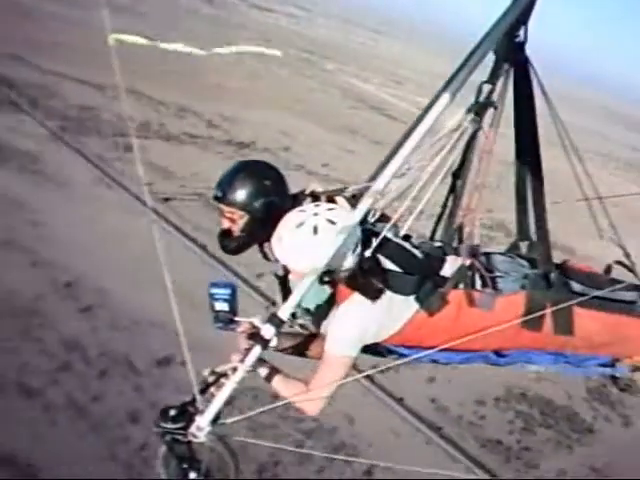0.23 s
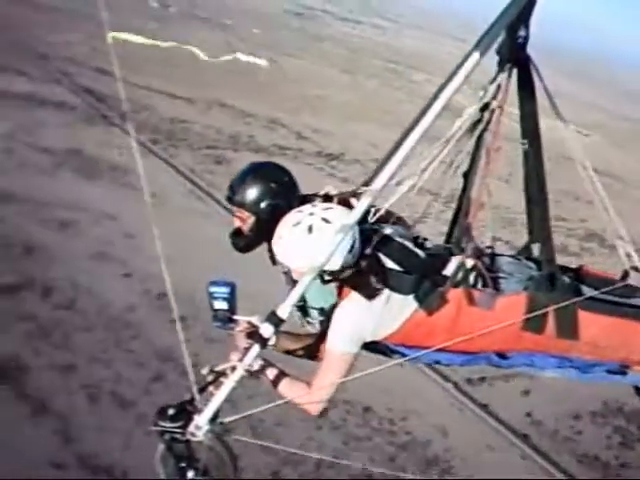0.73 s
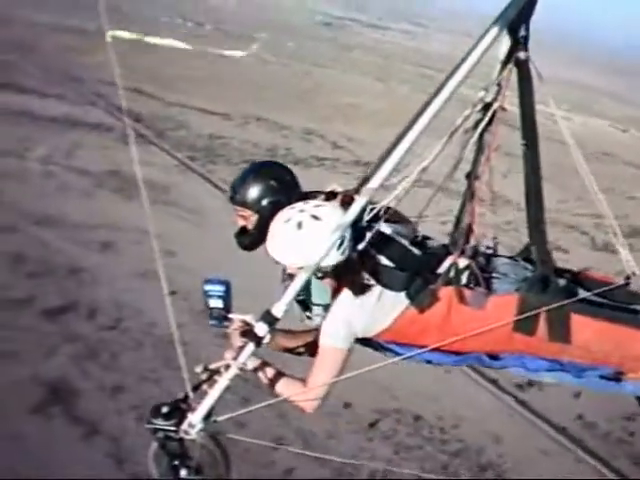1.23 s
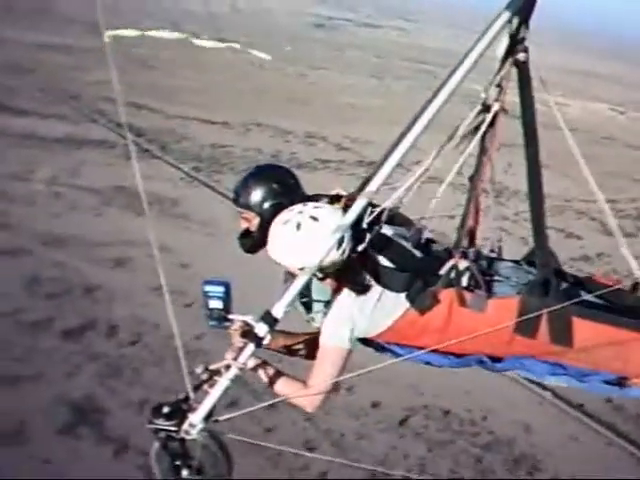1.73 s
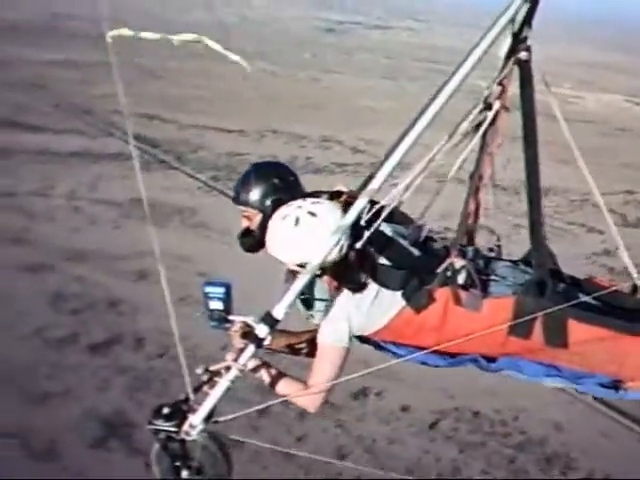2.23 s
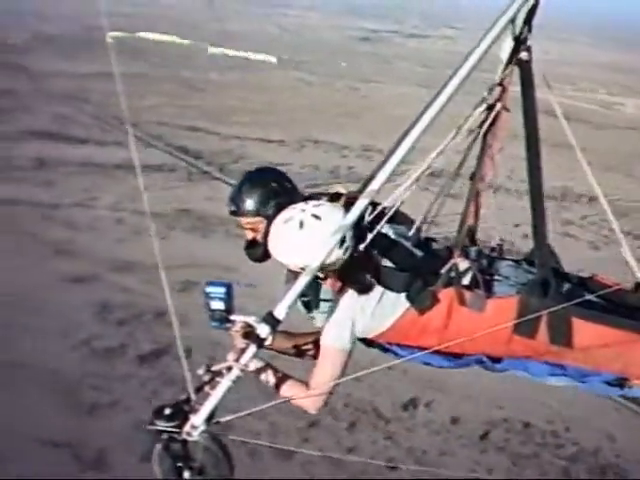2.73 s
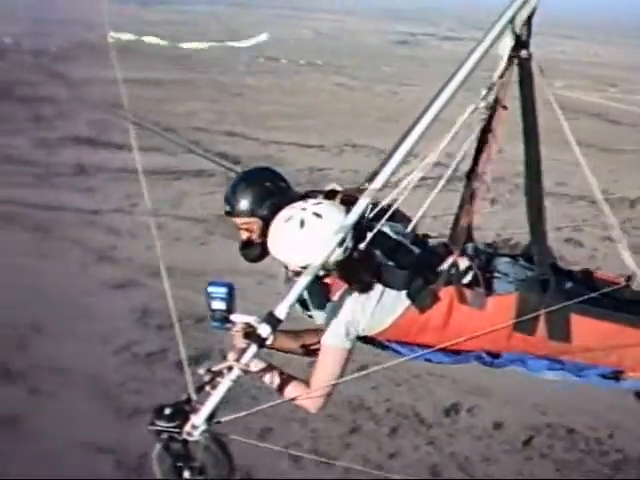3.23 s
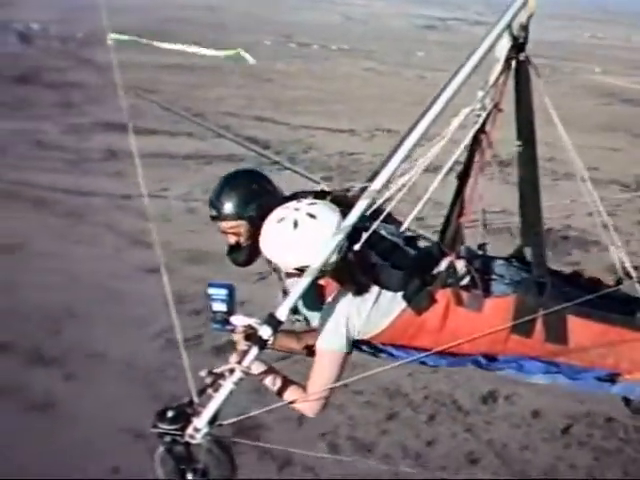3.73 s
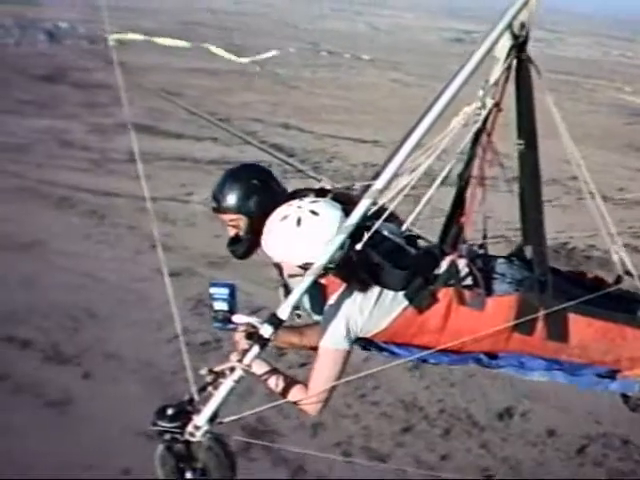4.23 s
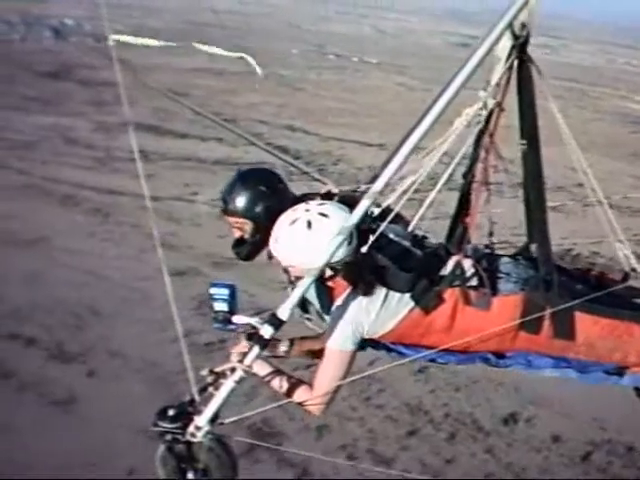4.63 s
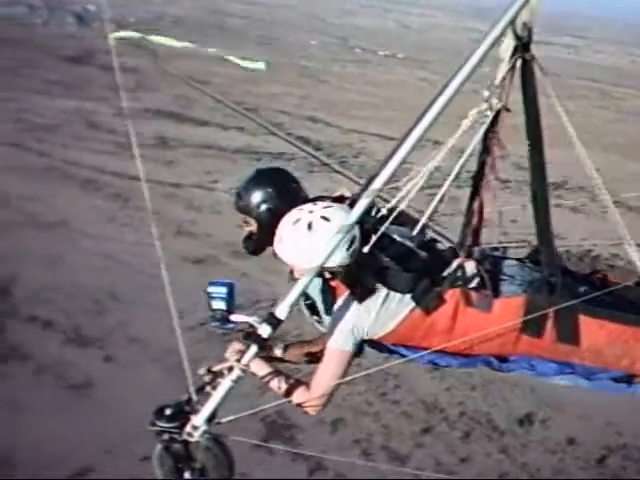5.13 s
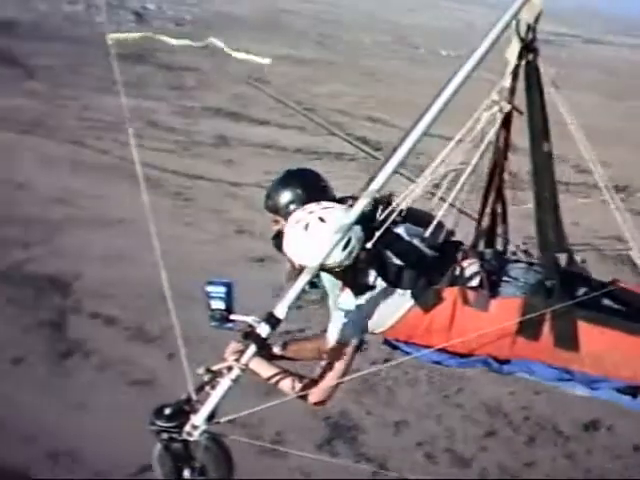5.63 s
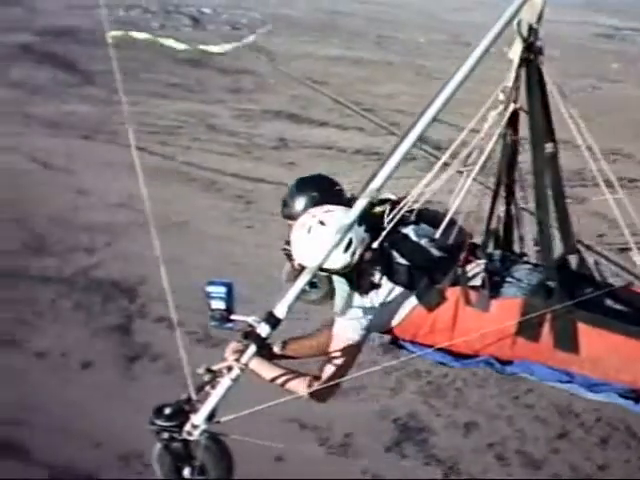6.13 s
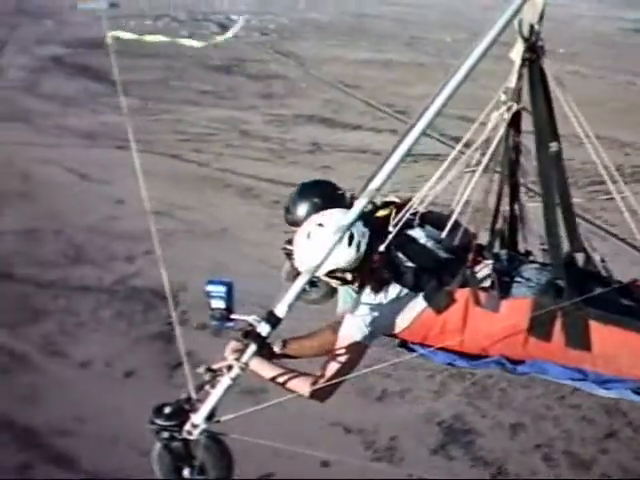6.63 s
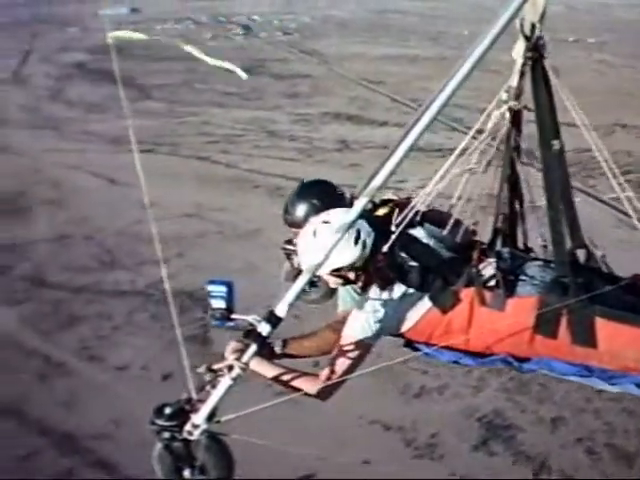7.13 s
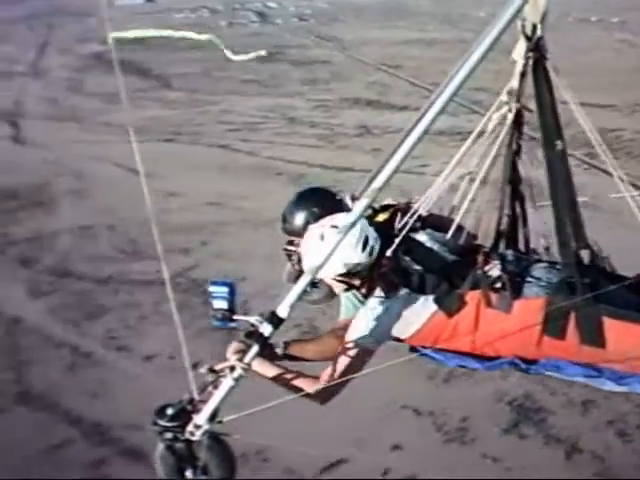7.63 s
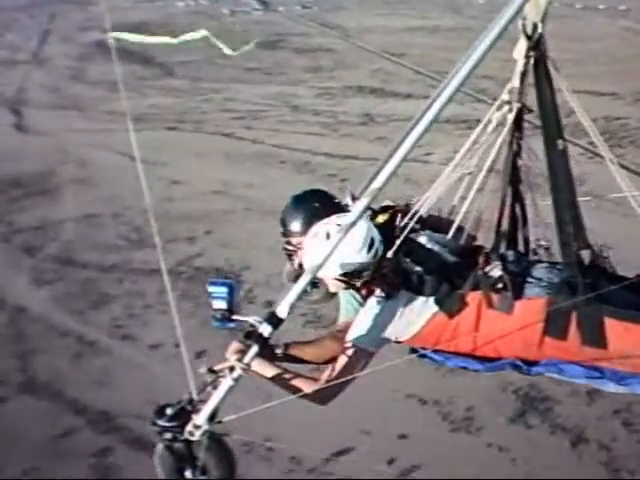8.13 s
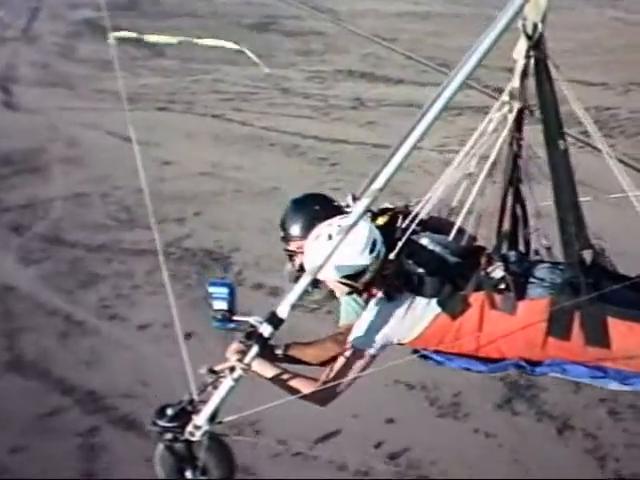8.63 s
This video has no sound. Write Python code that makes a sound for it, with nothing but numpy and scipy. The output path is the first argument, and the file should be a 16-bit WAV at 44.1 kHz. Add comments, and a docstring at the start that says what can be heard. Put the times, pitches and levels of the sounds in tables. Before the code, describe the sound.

Wind beats directly on an unprotected small microphone fixed to a hang glider in open air. Deep, rapid thumps overload it constantly, with harsh crackles crowding the first couple of seconds, then coming in looser clusters. A rough airy rush swells with each thump, over faint hiss and a thin wavering wire tone. Near eight seconds a tiny clean whistle bends up and down.

```python
"""Wind beats on the bare microphone of a small camera fixed to a hang glider in flight.
From the start, eddies (swirls of air) thump the membrane to its stops, a rush rides on them and a rigging wire
whistles faintly over hiss. A cheap 8 kHz converter turns this into held steps: it flattens strong pushes and
drops to zero on strong suctions, which is the crackle. Near 8 s a short clean whistle bends up and down."""
import sys
import numpy as np
from scipy import signal
from scipy.fft import rfft, irfft, next_fast_len
from scipy.io import wavfile
from scipy.ndimage import uniform_filter1d

SR = 44100
rng = np.random.default_rng(int(sys.argv[2]) if len(sys.argv) > 2 else 0)


def decibels_to_gain(level_db):
    """Convert a level in decibels to a linear amplitude gain (20 dB per decade)."""
    exponent = np.asarray(level_db, float) / 20
    return 10 ** exponent


def master_out(mix):
    """Clip the mix to full scale and print it as 16-bit PCM to the path in sys.argv[1]."""
    frames = np.transpose(np.atleast_2d(mix))
    ceiling = np.clip(frames, -1, 1)
    pcm = np.round(ceiling * 32767).astype(np.int16)
    wavfile.write(sys.argv[1], SR, pcm)


N = 391166

# strength of the airstream before gusts: (time [s], relative buffeting [dB], relative rush [dB])
AIRSTREAM = [(0.0, -14, -29), (0.88, -15, -28), (2.13, -14, -35), (2.65, -14.5, -33.5), (3.28, -16, -37),
             (3.58, -12, -29), (3.63, -21, -37), (3.65, -15, -31.5), (4.44, -15, -35.5),
             (4.48, -16.5, -38.5), (5.02, -15.5, -35.5), (5.22, -15, -36), (6.47, -16.5, -38),
             (6.52, -23, -40.5), (6.57, -17.5, -40.5), (6.81, -14.5, -33.5), (7.06, -16.5, -35.5),
             (7.94, -15, -41.5), (8.04, -19.5, -35.5), (8.06, -15, -44), (8.26, -22.5, -42.5),
             (8.33, -14.5, -41), (8.55, -17, -40), (8.8, -14, -41.5)]
# how fast eddies pass: (time [s], pace [1 = usual])
EDDY_PACE = [(0, 1.303), (1.3, 1.19), (2, 0.9), (3, 1.052), (4, 1.007), (5, 0.88), (6, .93), (7, 0.92),
             (8, 0.9), (8.87, 1.01)]
# colour of the thumping eddies: (frequency [Hz], relative power per Hz [dB])
BUFFET_SPECTRUM = [(25, -10), (45, -3), (75, 0.72), (110, -3), (150, -10), (200, -21.5), (280, -40.5)]
# colour of the rush: (frequency [Hz], relative power per Hz [dB])
RUSH_SPECTRUM = [(280, -6.5), (400, -1.5), (550, -0.53), (800, -3), (1300, -9.5), (2000, -18),
                 (3000, -24.5), (4000, -30.5)]
# the rigging wire's tone: (time [s], middle frequency [Hz], rms level [dB])
WIRE_TONE = [(0, 1145, -47.5), (2.1, 1175, -43.5), (3.8, 1130, -52), (5.1, 1098, -49.5), (5.9, 1142, -52.5),
             (6.5, 1087, -47.5), (7.7, 1055, -55), (8.87, 1031, -52)]
# eddies that suck the membrane past the converter's lower end: (time [s], time spent beyond the end [ms])
STRONG_SUCTIONS = [(.0041, .98), (.0607, .5), (.0702, 1.02), (.0782, .91), (.206, 1.25), (.2125, .27),
                   (.2199, .16), (.2303, .75), (.3042, .5), (.3325, .16), (.3656, 1), (.4194, 1.11),
                   (.5, .41), (.5316, 1), (.5536, .77), (.5617, .86), (.6333, 1), (.6416, .86),
                   (.6673, 1.38), (.6778, 1.11), (.7213, .54), (.7486, 1.36), (.7705, .91), (.7887, .98),
                   (.8868, .23), (.8926, .88), (.9373, .98), (.9503, 1.34), (.9631, .59), (1.0077, .23),
                   (1.0082, .12), (1.0373, .5), (1.0577, 1.25), (1.0762, 1.25), (1.0861, .75),
                   (1.0999, .75), (1.1289, .86), (1.2117, .5), (1.2298, 1.13), (1.3356, 1.02), (1.383, .77),
                   (1.4173, .34), (1.4535, .98), (1.4639, .61), (1.479, 1.2), (1.4917, .73), (1.5358, 1.25),
                   (1.6166, .27), (1.6293, 1.22), (1.6411, .63), (1.7952, .16), (1.8065, .34), (1.859, .98),
                   (1.9684, .27), (2.0021, 1.27), (2.0483, .98), (2.1691, 1), (2.1829, 1.11), (2.3163, 1),
                   (2.334, .98), (2.4501, .36), (2.5141, .61), (2.5482, .63), (2.7019, .59), (2.7469, .39),
                   (2.8022, .12), (2.8173, .63), (2.8875, .5), (2.8882, .36), (3.3672, 1), (3.4203, .63),
                   (3.4395, .16), (3.4601, .48), (3.4927, .66), (3.5298, .61), (3.5451, .13), (3.5459, .13),
                   (3.6041, 1.02), (3.6599, .41), (3.6713, .25), (3.6717, .63), (3.7244, .5), (3.7316, .27),
                   (3.7321, .34), (3.9098, .34), (3.9193, .59), (3.9902, .98), (4.0136, .98), (4.1262, .25),
                   (4.7196, .41), (5.3087, .86), (5.3502, .75), (5.8412, .52), (5.9131, .39), (6.1597, .86),
                   (6.3907, .5), (6.4028, .73), (6.676, .84), (6.7783, 1.11), (6.814, .75), (6.8389, .79),
                   (6.8556, .75), (7.2056, .88), (7.2219, .73), (7.4629, 1.02), (7.4756, .77),
                   (7.5019, .91), (7.5156, .41), (7.5769, .41), (7.7484, .48), (7.8138, .59), (7.8267, .48),
                   (8.4133, .75)]
# the short whistle: (time [s], frequency [Hz], peak level before wavering [dB])
WHISTLE_BEND = [(7.94, 1270, -75), (7.96, 1340, -47), (7.995, 1520, -48), (8.03, 1420, -48),
                (8.07, 1300, -52), (8.11, 1250, -75)]

# chance gusts, and surges around every strong suction
GUST_HZ, BUFFET_GUST_DB, RUSH_GUST_DB = 5.4, 1.0, 2
SURGE_S, BUFFET_SURGE_DB, RUSH_SURGE_DB = 0.022, 1.5, 3.0
# the membrane's stop: farthest swing, sharpness of the bend, buffeting level where eddies get a gain of 1
STOP, STOP_HARDNESS, STOP_AT_DB = 0.46, 3.5, -11.5
COUPLING_HZ = 64.15  # corner of the coupling capacitor
RUSH_RIDES = 0.4  # power law: the rush swells with the size of the passing eddy
HISS_DB = -58.5  # rms
# the converter: readings per second, and the size of its upper and lower ends
RATE_HZ, TOP, BOTTOM = 8000, 0.48, 0.5
# swing to an end at usual pace; eddies that stay longer arrive faster
SWING_MS, SWING_LOSS_PER_MS, SWING_SPREAD = 2.1, 0.37, 0.18
# crests above this height may hit the upper end: this share of them at this rush level
PUSH_ABOVE, PUSH_SHARE, PUSH_AT_DB = 0.33, 0.26, -33.5
PUSH_STAY_MIN_MS, PUSH_STAY_MAX_MS, PUSH_ROOM_S = 0.25, 1.45, 0.0035
REBOUND_SHARE, REBOUND_MS = 0.55, 5.5  # pushes that answer a suction, average delay at usual pace


def rms_one(x):
    """Scale to an rms (average strength) of 1."""
    return x / np.sqrt(np.mean(x ** 2) + 1e-20)


def in_time(rows):
    """Turn a table into smooth curves: one value per sample for each column after the time."""
    s, *columns = np.transpose(rows)
    return [np.interp(np.arange(N) / SR, s, column) for column in columns]


def drift(rate_hz):
    """Slow chance wandering, rms 1: noise at every 20th sample through two equal one-pole low-passes."""
    r = np.exp(-40 * np.pi * rate_hz / SR)
    noise = rng.standard_normal(N // 20 + 2002)
    slow = signal.lfilter([1], [1, -2 * r, r * r], noise)[2000:]
    return np.interp(np.arange(N) / 20, np.arange(len(slow)), rms_one(slow))


def coloured(spectrum):
    """Steady noise with a given spectrum, falling 15 dB an octave outside its ends; rms 1."""
    size = next_fast_len(N)
    hz = np.maximum(np.arange(size // 2 + 1) * SR / size, 1)
    at, db = np.transpose(spectrum)
    octaves_outside = np.maximum(np.log2(at[0] / hz), 0) + np.maximum(np.log2(hz / at[-1]), 0)
    gain = decibels_to_gain(np.interp(np.log(hz), np.log(at), db) - 15 * octaves_outside)
    return rms_one(irfft(rfft(rng.standard_normal(size)) * gain, size)[:N])


def gusty(buffet_db, rush_db):
    """Chance gusts, and surges around the strong suctions, lift the buffeting and the rush together."""
    marks = np.zeros(N)
    marks[(np.array(STRONG_SUCTIONS)[:, 0] * SR).astype(int)] = 1
    bump = np.exp(-(np.arange(-SR // 8, SR // 8 + 1) / (SURGE_S * SR)) ** 2)
    # tanh keeps crowded suctions from piling up
    surge = np.tanh(signal.fftconvolve(marks, bump, "same"))
    gust = drift(GUST_HZ)
    buffet_db = buffet_db + BUFFET_GUST_DB * gust + BUFFET_SURGE_DB * surge
    rush_db = rush_db + RUSH_GUST_DB * gust + RUSH_SURGE_DB * surge
    return buffet_db, rush_db


def passing_eddies(pace):
    """A frozen row of eddies (low noise) is carried past at the pace of the air."""
    place = np.cumsum(pace) % (N - 1)
    return np.interp(place, np.arange(N), coloured(BUFFET_SPECTRUM))


def rush_of_air(rush_db, eddies):
    """Higher noise whose level flickers by chance and swells with the power of the passing eddy."""
    rush = decibels_to_gain(rush_db + 7.5 + 1.5 * drift(18) + 2.0 * drift(60)) * coloured(RUSH_SPECTRUM)
    eddy_power = uniform_filter1d(eddies ** 2, size=SR // 70)
    return rush * (0.18 + eddy_power) ** (RUSH_RIDES / 2)


def membrane(buffet_db, rush_db, pace):
    """Eddies drive the membrane into its stops, silencing the rush there; the coupling capacitor lets flats sag."""
    eddies = passing_eddies(pace)
    thumps = decibels_to_gain(0.93 * (buffet_db - STOP_AT_DB)) * eddies
    push = thumps + rush_of_air(rush_db, eddies)
    # small pushes pass straight through, large ones bend towards the stop
    swing = STOP * push / (1 + np.abs(push) ** STOP_HARDNESS) ** (1 / STOP_HARDNESS)
    return signal.lfilter(*signal.butter(1, COUPLING_HZ, "high", fs=SR), swing)


def wire(width_hz=16):
    """Air whirling off the wire sheds vortices: a narrow, wavering band of noise around a gliding pitch."""
    hz, level_db = in_time(WIRE_TONE)
    phase = 2 * np.pi * np.cumsum(hz) / SR
    return decibels_to_gain(level_db) * (drift(width_hz) * np.cos(phase) + drift(width_hz) * np.sin(phase))


def preamplifier_hiss():
    """Steady noise of the preamplifier, low-passed at half the converter's rate."""
    hiss = signal.lfilter(*signal.butter(2, RATE_HZ / 2, fs=SR), rng.standard_normal(N))
    return decibels_to_gain(HISS_DB) * rms_one(hiss)


def find_overloads(x, rush_db, pace):
    """Rows (time [s], stay [ms], swing [ms], end): suctions, their rebounds, and crests hitting the upper end."""
    luck = rng.random((4, N))
    sucked, suction_stay = np.transpose(STRONG_SUCTIONS)
    at = (sucked * SR).astype(int)
    delay = REBOUND_MS / 1000 / pace[at] * (0.75 + 0.5 * luck[0, at])
    rebounds = (sucked + delay)[luck[1, at] < REBOUND_SHARE]
    crests = signal.find_peaks(x, height=PUSH_ABOVE, distance=SR // 125)[0]
    chance = PUSH_SHARE * decibels_to_gain(rush_db[crests] - PUSH_AT_DB)
    crests = crests[luck[0, crests] < chance] / SR
    pushed = np.sort(np.r_[rebounds, crests])
    # drop pushes too close to a suction or to the push before
    room = np.abs(pushed[:, None] - sucked).min(axis=1)
    pushed = pushed[(room > PUSH_ROOM_S) & (np.diff(pushed, prepend=-1) > PUSH_ROOM_S)]
    s = np.r_[sucked, pushed]
    at = (s * SR).astype(int)
    push_stay = np.interp(luck[2, at[len(sucked):]], [0, 1], [PUSH_STAY_MIN_MS, PUSH_STAY_MAX_MS])
    stay = np.r_[suction_stay, push_stay]
    swing = SWING_MS * (1 - SWING_LOSS_PER_MS * stay) / pace[at] ** 2
    swing = swing * (1 + SWING_SPREAD * (4 * luck[3, at] - 2))
    end = np.r_[np.full(len(sucked), -BOTTOM), np.full(len(pushed), TOP)]
    return sorted(zip(s, stay, np.maximum(swing, 0.2), end))


def add_overloads(x, overloads, sag_ms=3.0, lead_ms=2.2, release_ms=3.6):
    """Each big eddy takes over the wave: a swing to one end, a stay beyond it, then an exponential sag."""
    free = 0  # first sample after the stay before
    for s, stay, swing, end in overloads:
        stay = max(stay, 1000 / RATE_HZ)  # at least one converter reading
        first = max(int((s - (swing + lead_ms) / 1000) * SR), free)
        free = int((s + stay / 1000) * SR) + 2
        ms = (np.arange(first, min(first + SR // 40, N)) / SR - s) * 1000
        after = np.maximum(ms - stay, 0)
        shape = np.where(ms < 0, np.maximum(1 + ms / swing, -0.3), np.exp(-after / sag_ms))
        shape[(ms >= 0) & (after == 0)] = 1.2
        take_over = np.sin(np.pi / 2 * np.clip((ms + swing + lead_ms) / lead_ms, 0, 1)) ** 2
        # the longer the stay, the longer the membrane rests on its stop
        let_go = np.exp(-(after / (release_ms * (0.5 + stay))) ** 2)
        part = x[first:first + len(ms)]
        part += take_over * let_go * (end * shape - part)  # changes x itself


def converter(x):
    """Holds readings from a slightly wandering 8 kHz clock as steps; flattens pushes, zeroes strong suctions."""
    ticks = np.floor(np.arange(N) * RATE_HZ / SR + 0.6 * drift(6))
    new_reading = np.diff(ticks, prepend=-9) != 0
    taken = x[:, np.maximum.accumulate(np.arange(N) * new_reading)]
    # sixteen steps an octave of size: coarser for loud values
    step = 2 ** np.floor(np.log2(np.abs(taken) + 1 / 256)) / 16
    levels = np.minimum(np.round(taken / step) * step, TOP)
    levels[taken < -1.05 * BOTTOM] = 0  # the crackle
    return levels


def whistle():
    """One clean gliding tone whose level wavers a little."""
    hz, level_db = in_time(WHISTLE_BEND)
    return decibels_to_gain(level_db + 2.0 * drift(30)) * np.sin(2 * np.pi * np.cumsum(hz) / SR)


def scene():
    """The signal at the converter's input: wind, wire and whistle, then overloads, then hiss."""
    buffet_db, rush_db = in_time(AIRSTREAM)
    pace, = in_time(EDDY_PACE)
    x = membrane(*gusty(buffet_db, rush_db), pace) + wire() + whistle()
    # ordinary suctions round off just short of the lower end
    x = np.where(x < 0, x / (1 + (x / BOTTOM) ** 6) ** (1 / 6), x)
    add_overloads(x, find_overloads(x, rush_db, pace))
    return (x + preamplifier_hiss())[None]


def low_pass(x):
    """Removes everything above the highest recorded frequency."""
    return signal.sosfilt(signal.butter(12, 16690, fs=SR, output="sos"), x)


def record(dry):
    """The converter turns the signal into steps, then a steep low-pass cuts the top."""
    top_cut = signal.cheby2(16, 30, 15600, fs=SR, output="sos")  # 30 dB down from 15600 Hz, each way
    mix = signal.sosfiltfilt(top_cut, converter(dry))
    return low_pass(mix)


dry = scene()
out = record(dry)
master_out(out)
```